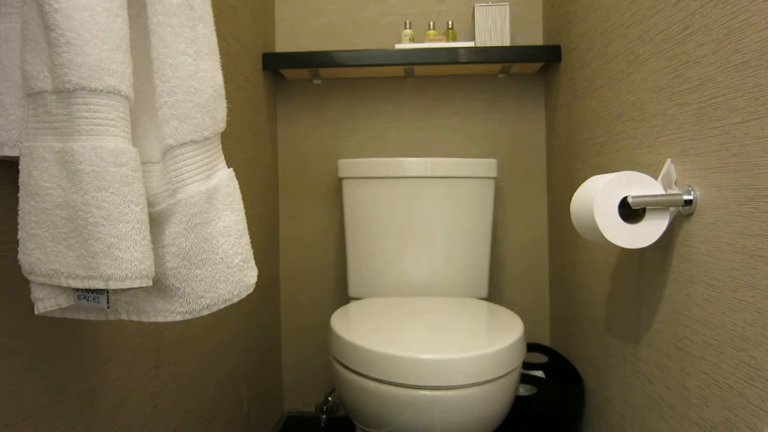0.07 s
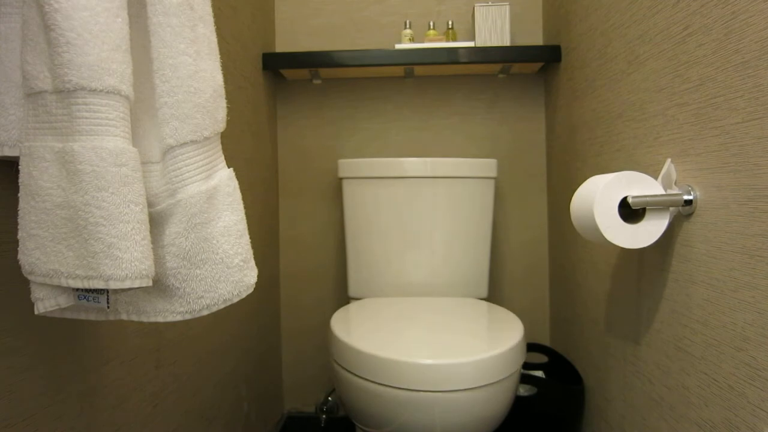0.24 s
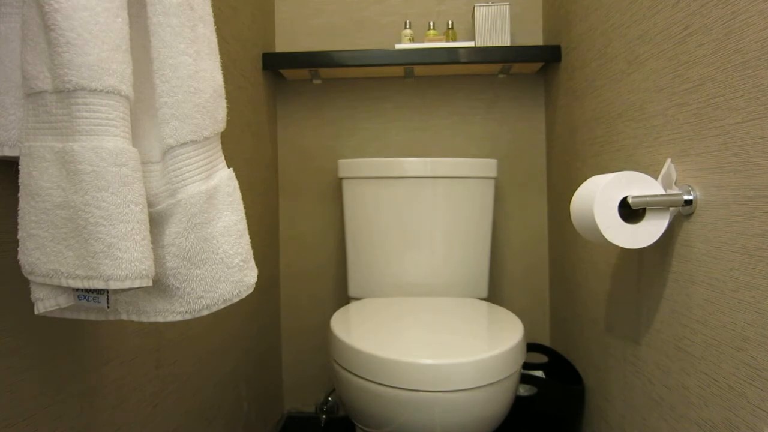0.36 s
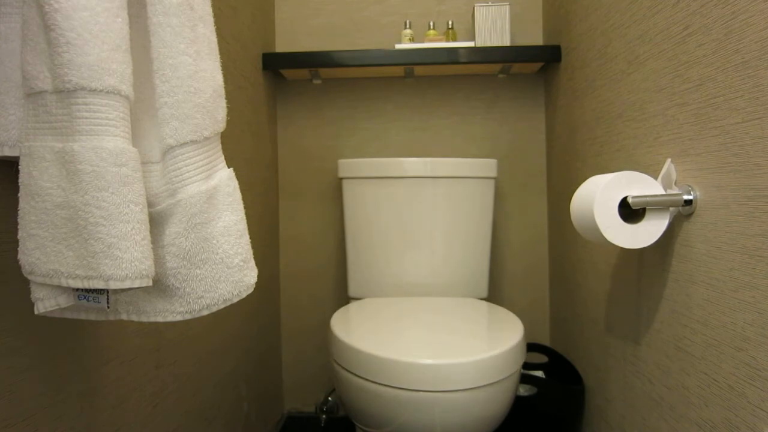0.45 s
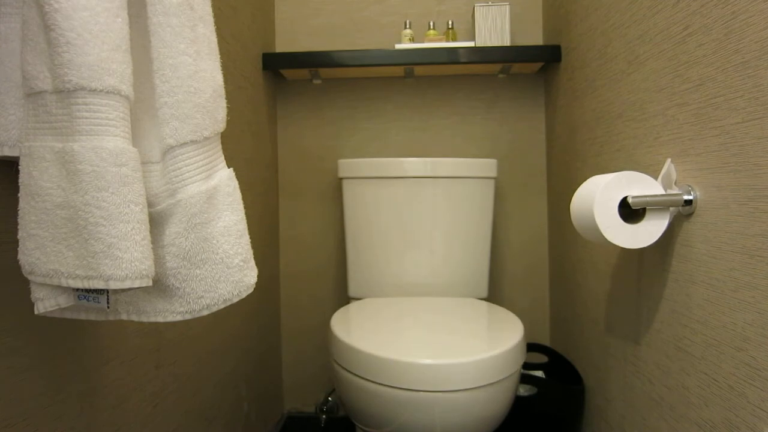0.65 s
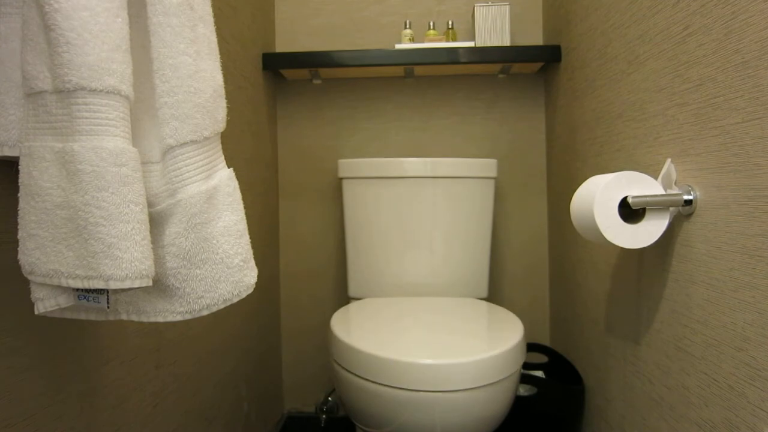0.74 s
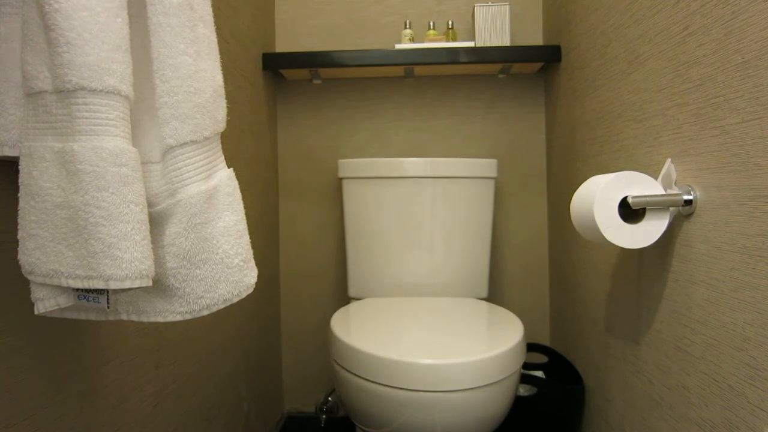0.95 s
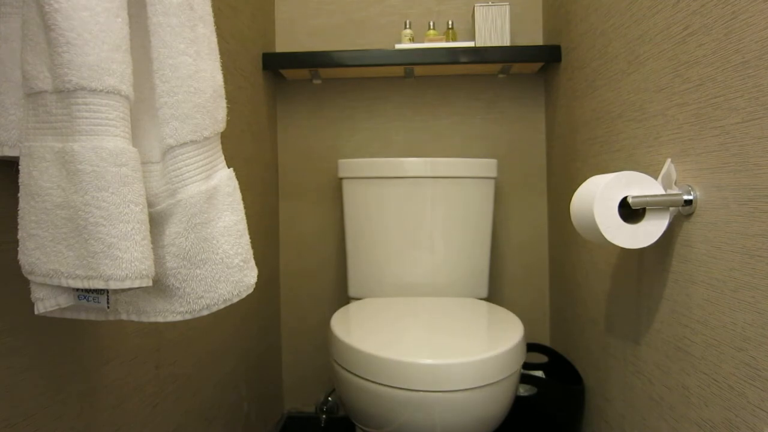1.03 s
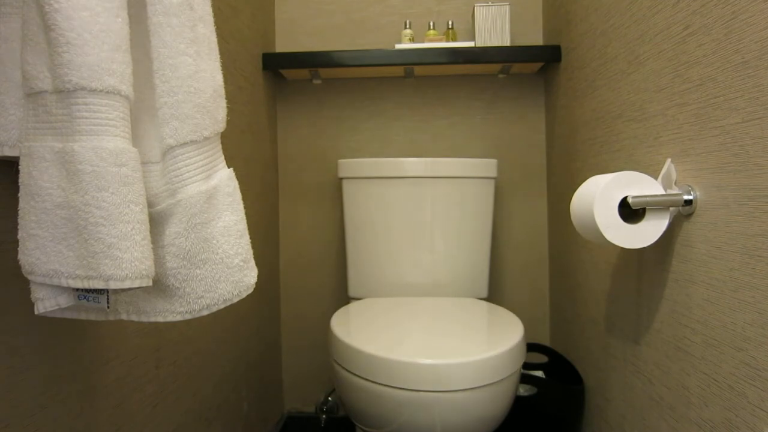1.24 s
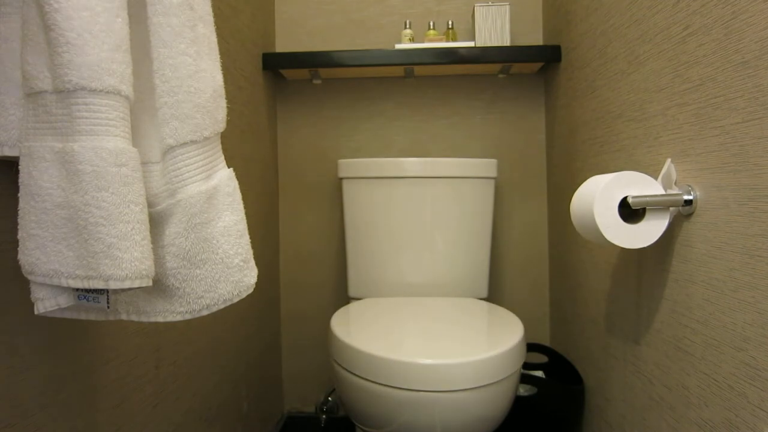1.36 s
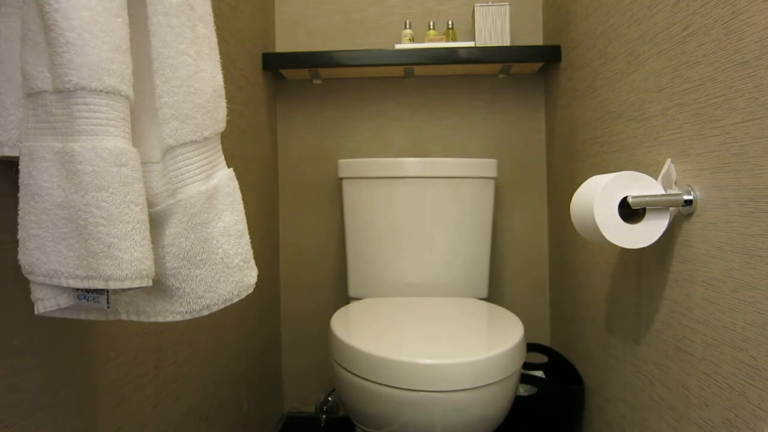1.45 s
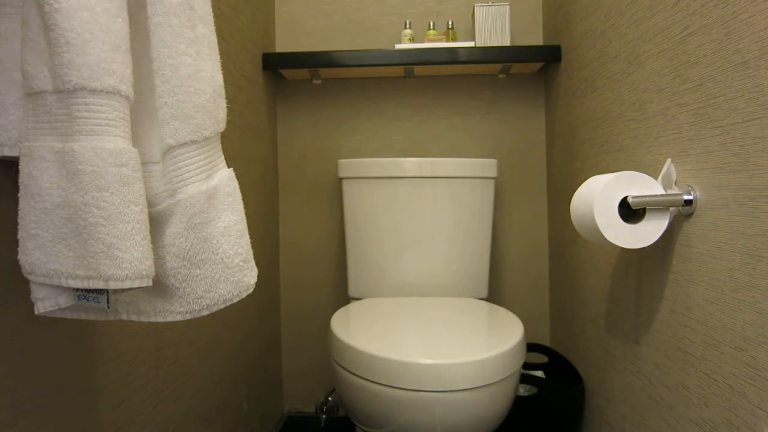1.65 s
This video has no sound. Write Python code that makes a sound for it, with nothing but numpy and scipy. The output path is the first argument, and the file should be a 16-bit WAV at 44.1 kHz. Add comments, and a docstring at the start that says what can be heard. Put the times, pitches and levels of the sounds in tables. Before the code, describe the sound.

Toilet lid closing: a quick booming clack and softer rebound, over low ventilation fan hum

```python
"""A toilet lid drops onto the seat in a small quiet bathroom, where a ventilation fan hums and rushes.
Early on two bumpers land, the lid rebounds and settles: the closed bowl booms and the lid clacks,
both as decaying modes, the bumpers knock in shaped noise, and the walls answer with a decaying noise tail.
A treble hiss of shaped noise dips at the thud, then swells slowly;
during the swell two faint scuffs pass, each a short bell of noise in two bands."""
import sys
import numpy as np
from scipy import signal
from scipy.fft import rfft, irfft, next_fast_len
from scipy.io import wavfile
from scipy.ndimage import uniform_filter1d, map_coordinates

SR = 44100
rng = np.random.default_rng(int(sys.argv[2]) if len(sys.argv) > 2 else 0)


def voltage_ratio(decibels):
    """Convert decibels (scalar or array-like) to amplitude ratios, 20 dB per decade."""
    exponent = np.asarray(decibels, float) / 20
    return 10 ** exponent


def generate_wav(sig):
    """Save sig (samples, or channels by samples) to the path in sys.argv[1] as 16-bit PCM at SR."""
    pcm = np.round(np.clip(np.atleast_2d(sig).T, -1, 1) * 32767).astype(np.int16)
    wavfile.write(sys.argv[1], SR, pcm)


N = 74970  # length in samples

# Stereo likeness of all steady noises. Each row: frequency in Hz, left-right correlation.
NOISE_LIKENESS = [(60, 0), (130, 0.6), (290, 0.17), (640, -0.13), (1410, -0.32), (3100, 0.47), (6820, 0.77),
                  (15000, 0.12)]
# Stereo balance of all steady noises. Each row: frequency in Hz, left minus right in dB.
NOISE_BALANCE = [(60, -3.5), (180, -4), (550, 0), (1650, 0), (4970, 0.5), (15000, 1.0)]

# Spectrum of the steady microphone hiss. Each row: frequency in Hz, relative density in dB per Hz.
MIC_HISS_SPECTRUM = [(1940, -29.5), (3300, -2), (4720, -3.5), (8040, -2.5), (8690, -4.5), (15600, -10.5)]
MIC_HISS_DB = -68  # rms
# Spectrum of the changing treble hiss. Each row: frequency in Hz, relative density in dB per Hz.
TREBLE_SPECTRUM = [(500, -31.5), (900, -2.5), (2000, 8), (3300, -2.5), (4750, -1.5), (7680, -1.5),
                   (11500, 0), (12600, -1.5), (14300, -4.5), (15600, -11.5)]
# Course of the treble hiss. Each row: time in seconds, rms level in dB.
TREBLE_COURSE = [(0, -61.5), (.19, -66), (.25, -76), (.42, -70), (.7, -63), (.95, -58), (1.2, -58),
                 (1.5, -54.5), (1.7, -56)]

# Hum lines of the fan. Each row: frequency in Hz, mean level in dB rms, phase lead of the left in radians.
FAN_LINES = [(151.15, -40.5, 0.92), (113, -50.5, 1)]
HUM_WAVER_DB, HUM_WAVER_RAD, HUM_WAVER_RATE = .9, .2, 12  # rms of each waver, knots per second
# Air noise of the fan. Each row: frequency in Hz, relative density in dB per Hz.
FAN_AIR = [(15, -71.5), (28, -26.5), (45, -26), (60, -13.5), (100, -16), (125, -14), (184, -16.5),
           (298, -15), (349, -20.5), (516, -20), (600, -16.5), (1290, -22), (1550, -26), (2300, -32),
           (3200, -45), (6000, -48), (8000, -74.5), (13000, -120)]
# Room resonances on the air noise. Each row: centre in Hz, width in Hz, height in dB.
ROOM_PEAKS = [(73.4, 16, 7), (206.5, 37, 5.5), (250.3, 9.8, 9.5), (290.5, 35, 9.5), (328.3, 7.7, 11),
              (404.6, 11.4, 9.5), (511.5, 74, 8.5)]
AIR_DB, AIR_WAVER_DB, AIR_WAVER_RATE = -39.5, 0.42, 5.8  # rms, rms of the waver, knots per second

# Faint scuffs. Each row: centre in seconds, length (two standard deviations) in seconds,
# low band level in dB, high band level in dB.
SCUFF_EVENTS = [(.99, .04, -54.5, -72), (1.115, .04, -52.5, -60.5)]
# Low and high band of a scuff. Each row: centre in Hz, width in Hz.
SCUFF_FILTERS = [(1900, 900), (5400, 1500)]

# Decay of the bathroom's answer. Each row: frequency in Hz, t60 in seconds.
WALL_DECAY = [(200, 0.51), (800, 0.3), (2500, 0.14), (8000, 0.058)]
WALLS_DB, WALLS_DELAY_S = -8.5, .004
WALLS_SIDE_DB = -5  # side against mid: the width of the answer
BOOM_TO_WALLS_DB = -16  # the boom reaches the walls this much weaker than the clack

# Modes of the air shut in the bowl. Each row: frequency in Hz, level relative to the push in dB,
# t60 in seconds, time constant of the swell in seconds, phase lead of the left in radians.
BOWL_MODES = [(210.4, 10, .095, .04, .3), (183.7, -23.4, .385, .002, .6), (222, -16.6, .5, .04, .3)]
# Pushes of the lid on that air. Each row: start in seconds, level in dB.
LID_PUSHES = [(.2018, -2.9), (.2070, -.3), (.2677, -8.6), (.2904, -12), (.3163, -13.6), (.3257, -17.6),
              (.4059, -25), (.4600, -31)]

# Modes of the lid. Each row: frequency in Hz, level at landing in dB, level at rebound in dB
# (both relative to the contact), t60 in seconds, phase lead of the left in radians.
LID_MODES = [(427, -6.5, -7.5, 0.12, .3), (477.4, -4, -10, 0.071, 0.27), (512.3, -7.5, -9, 0.088, .3),
             (595.7, -6.5, -16.5, .2, .3), (652, -3, -3.5, 0.1, .3), (783, -11, -20, .12, .5),
             (846.5, -3.5, -10.5, 0.13, .6), (973, -7, -5, 0.28, 0.83), (1080.3, -12, -19, 0.13, 0.55),
             (1381, -0.5, -5, 0.056, 1.3), (1538, -15, -18, 0.11, .7), (1690, -13.5, -5, .12, .7),
             (1810, -14, -14.5, 0.11, .5), (2020, -16, -18.5, .11, .7), (2385, -26.5, -21, 0.16, .7),
             (2702, -19.5, -17.5, 0.058, 0.76)]
LID_ATTACK_S, LID_SCATTER_DB, LID_DETUNE = .0015, 1.2, .002  # detuning as a fraction of the frequency
# Bumper contacts. Each row: start in seconds, level in dB, tilt in dB per octave about 1 kHz,
# stage (only its whole part counts: 0 takes the landing levels of the modes, 1 the rebound levels).
CONTACTS = [(.1998, -21.5, 1.5, 0), (.2042, -20, 0.67, 0), (.2151, -24.5, -0.45, 0), (.2690, -24, .6, 0.94),
            (.2730, -26.5, -0.014, 1), (.2841, -28.5, -0.29, 1), (.2982, -27.5, 0.67, 0.9),
            (.3163, -31, -0.45, 0.94), (.3354, -37, -0.64, 0.91), (.3620, -38, -2.8, 0.87)]
# Dull knock of the bumpers. Each row: frequency in Hz, relative density in dB per Hz.
KNOCK_SPECTRUM = [(150, -9.5), (350, -2.5), (1100, -6), (2600, -22.5), (3200, -30.5), (4200, -38),
                  (5500, -48.5), (10000, -57), (13000, -70.5), (20000, -120)]
KNOCK_DB, KNOCK_T60_S, KNOCK_ATTACK_S = -2, 0.085, 0.00053  # level before tilt, relative to the contact
LID_PAN_DB = -.9  # left minus right, for lid, bowl and walls


def unit(x):
    """Normalisation: scales a signal to an rms of 1."""
    return x / np.sqrt(np.mean(x ** 2) + 1e-20)


def along(points, hz):
    """Interpolation: reads (Hz, value) points on a logarithmic frequency axis."""
    f, v = np.transpose(points)
    return np.interp(np.log(hz + 1), np.log(f + 1), v)


def wobble(rate):
    """Slow random modulation: a smooth curve through rate random knots a second."""
    knots = rng.standard_normal(int(N * rate / SR) + 4)
    return map_coordinates(knots, [np.arange(N) * rate / SR])


def filtered(x, response):
    """Linear filtering: multiplies the spectrum by a response of frequency."""
    m = next_fast_len(x.shape[-1] + 8192)
    spectrum = rfft(x, m) * response(np.fft.rfftfreq(m, 1 / SR))
    return irfft(spectrum, m)[..., :x.shape[-1]]


def resonance(hz, centre, width):
    """Resonance curve: a peak of height 1 that falls to half at half the width from its centre."""
    return 1 / (1 + (2 * (hz - centre) / width) ** 2)


def left_right(difference):
    """Interchannel difference: half of it added on the left, half taken off on the right."""
    return np.array([[difference / 2], [-difference / 2]])


def pan(db):
    """Level panning: left and right gains for a left-minus-right level."""
    return voltage_ratio(left_right(db))


def rush(gain, patchy_db):
    """Partly correlated noise: mid and side share the power by likeness; rms 1, gains vary in patches."""
    z = signal.stft(rng.standard_normal((2, N)), nperseg=512)[2]
    patches = uniform_filter1d(rng.standard_normal(z.shape[1:]), size=6, axis=0)
    patches = uniform_filter1d(patches, size=10, axis=1)
    pair = signal.istft(z * voltage_ratio(patchy_db * unit(patches)), nperseg=512)[1][:, :N]

    def mid_side_gain(hz):
        angle = np.arccos(np.clip(along(NOISE_LIKENESS, hz), -1, 1)) / 2
        return gain(hz) * [np.cos(angle), np.sin(angle)]

    mid, side = filtered(pair, mid_side_gain)
    stereo = np.array([mid + side, mid - side])
    return unit(filtered(stereo, lambda hz: voltage_ratio(along(NOISE_BALANCE, hz) * [[.5], [-.5]])))


def ring(t, hz, db, t60, attack, lead):
    """Damped mode: an exponentially decaying sine at two microphones, the left leading in phase."""
    envelope = voltage_ratio(db - 60 * t / t60) * (1 - np.exp(-t / attack))
    return envelope * np.sin(2 * np.pi * hz * t + left_right(lead))


def hiss():
    """Broadband noise: steady microphone hiss, and a treble hiss that dips at the thud and then swells."""
    steady = voltage_ratio(MIC_HISS_DB) * rush(lambda hz: voltage_ratio(along(MIC_HISS_SPECTRUM, hz)), patchy_db=.5)
    level_db = np.interp(np.arange(N) / SR, *np.transpose(TREBLE_COURSE))
    return steady + voltage_ratio(level_db) * rush(lambda hz: voltage_ratio(along(TREBLE_SPECTRUM, hz)), patchy_db=1.1)


def fan():
    """Tones over flow noise: slightly unsteady hum lines and air noise shaped by the small room."""
    t = np.arange(N) / SR
    hum = 0
    for hz, db, lead in FAN_LINES:
        level = np.sqrt(2) * voltage_ratio(db + HUM_WAVER_DB * wobble(HUM_WAVER_RATE))  # rms to peak
        phase = 2 * np.pi * hz * t + HUM_WAVER_RAD * wobble(HUM_WAVER_RATE) + rng.uniform(0, 2 * np.pi)
        hum = hum + level * np.sin(phase + left_right(lead))

    def air_gain(hz):
        peaks_db = sum(db * resonance(hz, centre, width) for centre, width, db in ROOM_PEAKS)
        return voltage_ratio(along(FAN_AIR, hz) + peaks_db)

    air_level = voltage_ratio(AIR_DB + AIR_WAVER_DB * wobble(AIR_WAVER_RATE))
    return hum + air_level * rush(air_gain, patchy_db=-0.5)


def scuffs():
    """Band noise under a bell-shaped envelope: faint brushes in two bands, alike on both sides."""
    t, out = np.arange(N) / SR, np.zeros(N)
    for s, length, *levels_db in SCUFF_EVENTS:
        envelope = np.exp(-(2 * (t - s) / length) ** 2 / 2)
        for (centre, width), db in zip(SCUFF_FILTERS, levels_db):
            noise = rng.standard_normal(N)
            band = unit(filtered(noise, lambda hz: resonance(hz, centre, width)))
            out += voltage_ratio(db) * envelope * band
    return out


def walls(x):
    """Reverberation: convolution with noise in which each frequency dies at its own speed."""
    hz, t, z = signal.stft(rng.standard_normal((2, SR // 2)), SR, nperseg=256)
    decay = voltage_ratio(-60 * t / along(WALL_DECAY, hz)[:, None])
    mid, side = signal.istft(z * decay, SR, nperseg=256)[1]
    side = voltage_ratio(WALLS_SIDE_DB) * side
    tail = np.array([mid + side, mid - side])
    late = np.pad(x.mean(axis=0), (round(WALLS_DELAY_S * SR), 0))[None]
    return signal.fftconvolve(late, tail / np.linalg.norm(tail[0]), axes=1)[:, :N]


def bowl():
    """Superposition: every push swells the shut-in air; later ones add to or cancel the ringing."""
    t, boom = np.arange(N) / SR, 0
    for s, db in LID_PUSHES:
        since = np.maximum(t - s, 0)
        boom = boom + voltage_ratio(db) * sum(ring(since, *mode) for mode in BOWL_MODES)
    return boom


def lid():
    """Modal excitation by impact: every contact rings the lid's modes anew and adds a noise knock."""
    clack, t = np.zeros((2, 2 * N)), np.arange(SR // 2) / SR
    for s, hit_db, tilt_db, stage in CONTACTS:
        modes = 0
        for hz, *levels_db, t60, lead in LID_MODES:
            detuned = hz * (1 + LID_DETUNE * rng.normal())
            db = levels_db[int(stage)] + LID_SCATTER_DB * rng.normal() + tilt_db * np.log2(hz / 1000)
            modes = modes + ring(t, detuned, db, t60, LID_ATTACK_S, lead)
        noise = unit(filtered(rng.standard_normal(len(t)), lambda hz: voltage_ratio(along(KNOCK_SPECTRUM, hz))))
        # below 300 Hz the tilt stays constant
        noise = filtered(noise, lambda hz: voltage_ratio(tilt_db * np.log2(np.maximum(hz, 300) / 1000)))
        envelope = voltage_ratio(KNOCK_DB - 60 * t / KNOCK_T60_S) * (1 - np.exp(-t / KNOCK_ATTACK_S))
        clack[:, round(s * SR):][:, :len(t)] += voltage_ratio(hit_db) * (modes + envelope * noise)
    return clack[:, :N]


def scene():
    """Superposition of sources: bowl and lid with the room, over fan, hiss and scuffs."""
    boom, clack = bowl(), lid()
    room = voltage_ratio(WALLS_DB) * walls(clack + voltage_ratio(BOOM_TO_WALLS_DB) * boom)
    return pan(LID_PAN_DB) * (boom + clack + room) + fan() + hiss() + scuffs()


def top_cut(x):
    """Nothing passes above the cut-off."""
    return signal.sosfilt(signal.butter(12, 15750, fs=SR, output="sos"), x)


def record(dry):
    """Capture: takes the finished mix to the output."""
    return top_cut(dry)


dry = scene()
out = record(dry)
generate_wav(out)
```